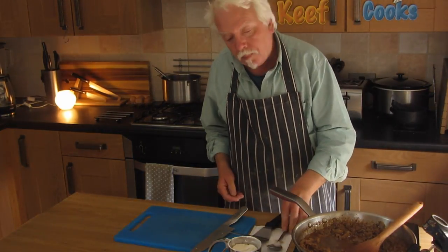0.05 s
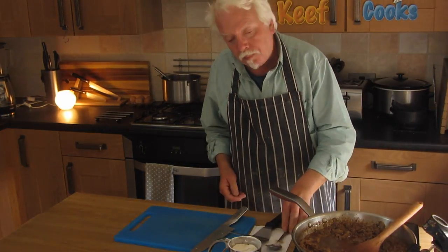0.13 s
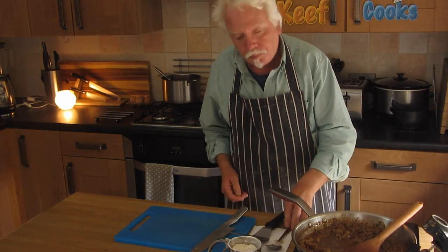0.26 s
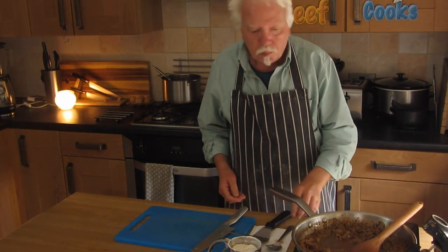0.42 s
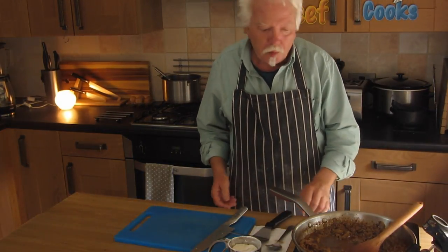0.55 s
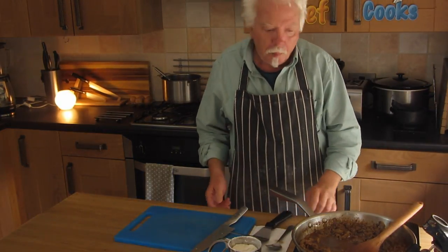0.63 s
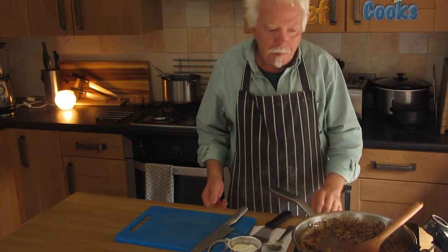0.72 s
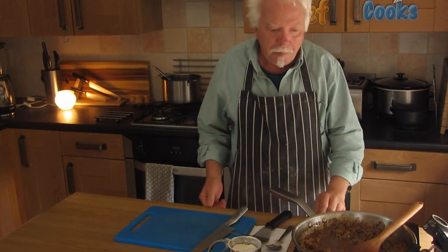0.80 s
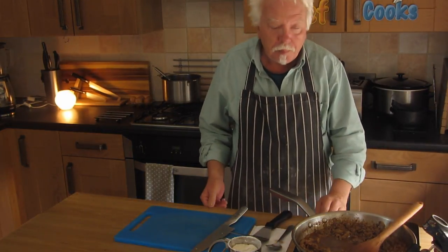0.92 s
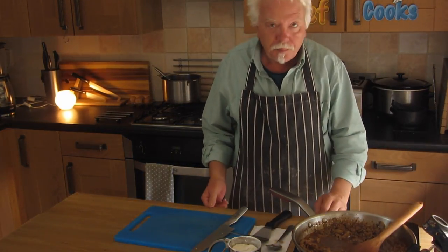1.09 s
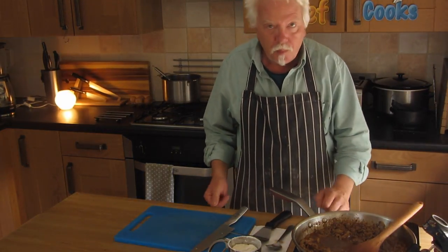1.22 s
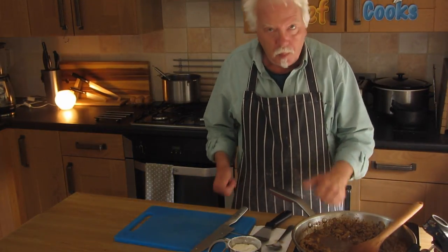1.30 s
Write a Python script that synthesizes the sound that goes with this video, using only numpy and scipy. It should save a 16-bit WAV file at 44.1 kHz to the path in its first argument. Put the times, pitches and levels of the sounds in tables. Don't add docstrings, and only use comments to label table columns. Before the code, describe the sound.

Sharp clattering knock near the start, overloading the microphone, with short metallic ringing and room reverberation; a steady low airy hum continues underneath, with small clicks and soft low thumps of air, in a kitchen.

```python
import sys
import numpy as np
from scipy import signal
from scipy.fft import rfft, irfft, next_fast_len
from scipy.io import wavfile
from scipy.ndimage import uniform_filter1d, map_coordinates

SR = 44100
rng = np.random.default_rng(int(sys.argv[2]) if len(sys.argv) > 2 else 0)


def magnitude_from_level(level_db):
    exponent = np.asarray(level_db, float) / 20
    return 10 ** exponent


def put_to_file(sound):
    columns = np.atleast_2d(sound).T
    safe = np.clip(columns, -1, 1)
    whole_steps = np.round(safe * 32767)
    wavfile.write(sys.argv[1], SR, whole_steps.astype(np.int16))


N = 59535


def unit(x):
    return x / np.sqrt(np.mean(x ** 2) + 1e-20)


def along(points, hz):
    f, v = np.transpose(points)
    return np.interp(np.log(hz + 1), np.log(f + 1), v)


def wobble(rate_hz):
    knots = rng.standard_normal(int(N * rate_hz / SR) + 4)
    return map_coordinates(knots, [np.arange(N) * rate_hz / SR])


def filtered(x, response):
    m = next_fast_len(N + SR // 2)
    spectrum = rfft(x, m) * response(np.fft.rfftfreq(m, 1 / SR))
    return irfft(spectrum, m)[..., :N]


def peak(f, hz, width_hz):
    return 1j * f * width_hz / (hz * hz - f * f + 1j * f * width_hz)


def pair(gain, alike):
    def mid_side(hz):
        turn = np.arccos(np.clip(along(alike, hz), -1, 1)) / 2
        return gain(hz) * [np.cos(turn), np.sin(turn)]

    mid, side = filtered(rng.standard_normal((2, N)), mid_side)
    return unit(np.array([mid + side, mid - side]))


def fading(gain, alike, t60_scale):
    # f/Hz, t60/s
    kitchen_t60 = [(150, .3), (700, 0.37), (2000, 0.46), (5200, 0.49), (6000, 0.38)]
    hz, t, z = signal.stft(pair(gain, alike), SR, nperseg=256)
    t60_s = t60_scale * along(kitchen_t60, hz)[:, None]
    return signal.istft(z * magnitude_from_level(-60 * t / t60_s), SR, nperseg=256)[1][:, :N]


def draught():
    # t/s, peak level/dB, swing f/Hz, length/s, left over right/dB
    puff_events = [
        (0.131, -24.5, 35.7, 0.018, -2),
        (0.193, -24.5, 28.5, 0.033, -2),
        (0.231, -8, 32, 0.02, -7.5),
        (0.346, -31.5, 24, 0.063, 0.5),
        (0.621, -22.5, 41, 0.027, -16.5),
        (0.916, -33.5, 24.47, 0.037, 7),
        (1.031, -32, 34.6, 0.037, -5.5),
        (1.151, -29, 27, 0.04, -4),
        (1.204, -16, 33, 0.024, -18),
        (1.328, -31, 26.4, 0.09, -4),
    ]
    # f/Hz, density/(dB per Hz)
    rumble_spectrum = [(10, -2), (28, -11.5), (60, -11), (100, -28), (160, -61)]
    rumble_db = -46.5
    t = np.arange(N) / SR
    phases = rng.uniform(0, 2 * np.pi, (len(puff_events), 2, 1))
    puffs = 0
    for phase, (at_s, db, hz, span_s, lean_db) in zip(phases, puff_events):
        level = magnitude_from_level(db + np.minimum(0, [[lean_db], [-lean_db]]))
        swell = np.exp(-((t - at_s) / span_s) ** 2)
        puffs = puffs + level * swell * np.cos(2 * np.pi * hz * (t - at_s) + phase)
    rumble = pair(lambda hz: magnitude_from_level(along(rumble_spectrum, hz)), [(30, .1)])
    return puffs + magnitude_from_level(rumble_db) * rumble


def fan():
    # multiple of blade rate, level/dB rms
    blade_tones = [(1, -57), (5, -53), (6, -40), (7, -38.5), (8, -42), (9, -42.5)]
    # f/Hz, width/Hz, level/dB
    housing_modes = [(196.7, 14, -15.5), (337.2, 53, -3), (367.7, 16, 1.5), (401.8, 12.4, 0.5),
                     (430.2, 22.4, -1.5), (496, 12, -5), (554.3, 55, -5.5)]
    # f/Hz, density/(dB per Hz)
    air_spectrum = [(60, -28), (130, -15), (300, -8), (1000, -8), (1450, -14), (1980, -12), (2250, -20.5),
                    (4950, -27), (6600, -34)]
    # f/Hz, likeness/1
    likeness = [(60, 0.17), (180, 0.32), (540, 0.97), (1640, 0.74), (4940, 0.6), (14900, 0.23)]
    # f/Hz, left over right/dB
    stereo_lean = [(60, -26), (150, 4.5), (380, -3.5), (940, -3), (2370, -3.5), (5930, -1.0), (14900, -4.5)]
    blade_hz, blade_drift, blade_db = 142.84, .0012, -1
    whine_hz, whine_db = 1254, -45.5
    housing_db, air_db = -30, -31.5

    def boom(f):
        return np.sqrt(sum(np.abs(magnitude_from_level(db) * peak(f, c, w) ** 2) ** 2 for c, w, db in housing_modes))

    def lean_gain(hz):
        return magnitude_from_level(along(stereo_lean, hz) / 2 * np.array([[1], [-1]]))

    air = magnitude_from_level(air_db + 0.78 * wobble(7.2)) * pair(lambda hz: magnitude_from_level(along(air_spectrum, hz)), likeness)
    housing = magnitude_from_level(housing_db + 1.1 * wobble(25)) * pair(boom, likeness)
    turns = 2 * np.pi * np.cumsum(blade_hz * (1 + blade_drift * wobble(4.5))) / SR
    tones = 0
    for k, db in blade_tones:
        phase = rng.uniform(0, 5.17) + rng.normal(0, 0.6, (2, 1))
        tones = tones + magnitude_from_level(db + blade_db + 1.2 * wobble(11.2)) * np.sin(k * turns + phase)
    whine = magnitude_from_level(whine_db + 1.4 * wobble(17)) * np.sin(2 * np.pi * whine_hz * np.arange(N) / SR)
    return filtered(air + housing + np.sqrt(2) * (tones + whine), lean_gain)


def ticks():
    # t/s, peak level/dB, centre f/Hz, width/Hz
    tick_events = [(.0184, -40, 4800, 3000), (.140, -40, 4500, 3000), (.560, -40, 6300, 1500),
                   (.684, -37, 5300, 1500), (.686, -32, 2950, 600), (.701, -36, 5000, 2500),
                   (.746, -32, 5800, 2500), (.824, -26, 5500, 2000), (.870, -36, 5000, 2000),
                   (.92, -41, 6100, 800), (1.060, -40, 5000, 2000), (1.272, -38, 5400, 900),
                   (.8190, -22, 3600, 700), (.8190, -27, 2700, 500), (.8194, -19.5, 4800, 1500),
                   (.8197, -29, 5900, 1200)]
    room_db = -3.5
    direct = 0
    for at_s, db, hz, width_hz in tick_events:
        tap = np.zeros(N)
        tap[round(at_s * SR)] = 1
        direct = direct + magnitude_from_level(db) * filtered(tap, lambda f: peak(f, hz, width_hz) ** 2 * SR / width_hz)
    room = fading(np.ones_like, [(1000, 0.3)], t60_scale=0.66)[:, :SR // 2]
    room = room / np.linalg.norm(room[0])
    late = np.pad(direct, (100, 0))[None]
    wet = signal.fftconvolve(late, room, axes=1)[:, :N]
    return direct * magnitude_from_level([[-1.5], [1.5]]) + magnitude_from_level(room_db) * wet


def knock():
    # f/Hz, level/dB, t60/s
    body_modes = [(139.6, -25, 0.39), (230.2, -7.5, 0.18), (406, -4, 0.13), (686.4, -9, 0.42),
                  (920.7, -9, 0.32), (1150, -16, 0.44), (1644, -7.5, 0.22), (1833, -11.5, 0.42),
                  (1972, -11, .4), (2180, -10, 0.37), (2410, -16.5, 0.21), (2550, -11.5, 0.28),
                  (2680, -11, 0.38), (3037, -17, 0.16)]
    # f/Hz, level/dB, t60/s
    pan_modes = [(2633, -27, 1.3), (3300, -18, .3), (4200, -19, .25), (5300, -22, .2), (6170, -36, 1.2)]
    # f/Hz, density/(dB per Hz)
    blow_spectrum = [(70, -44), (250, -9), (450, -3.5), (927, -2.5), (1400, -9.5), (2300, -2),
                     (5200, -17.5), (5900, -21.5), (6600, -35.5)]
    knock_s, knock_db, ring_db, rattle_db = .2066, 0, -4, -6.5
    t, start = np.arange(N) / SR, round(knock_s * SR)

    def colour(hz):
        return magnitude_from_level(along(blow_spectrum, hz))

    crack = magnitude_from_level(knock_db + 6 - 60 * t / 0.024) * pair(colour, [(500, 0.71)])
    ring = 0
    for hz, db, t60_s in body_modes + pan_modes:
        phase = rng.uniform(0, 6) + rng.normal(0, .35, (2, 1))
        decay = magnitude_from_level(ring_db + db + 2.5 * wobble(40) - 60 * t / t60_s)
        ring = ring + decay * np.sin(2 * np.pi * hz * t + phase)
    tail = magnitude_from_level(rattle_db) * fading(colour, [(200, 1.0), (1000, 0.64), (5000, .7)], t60_scale=1.035)
    rise = magnitude_from_level(-21.5 - 60 * t[::-1] / 0.036)[-start:]
    lead = rise * pair(colour, [(500, 0.49)])[:, :start]
    blow = (crack + ring + tail) * (1 - np.exp(-t / 0.00013))
    return np.concatenate([lead, blow[:, :N - start]], axis=1)


def scene():
    return draught() + fan() + ticks() + knock()


def roll_off(x):
    return signal.sosfilt(signal.butter(12, 15470, fs=SR, output="sos"), x)


def record(dry):
    ceiling, hardness = 1, 30
    top_hz, mask_hz, mask_db, mask_db_per_khz = 6600, 6300, -32.5, 8

    def clip(x):
        return x / (1 + np.abs(x / ceiling) ** hardness) ** (1 / hardness)

    hz, t, z = signal.stft(clip(dry), SR, nperseg=1024)
    power = np.mean(np.abs(z) ** 2, axis=0)
    loudness = power[hz > 1500].sum(axis=0)
    slope_db = mask_db + mask_db_per_khz * (hz[:, None] - mask_hz) / 1000
    mask = loudness * magnitude_from_level(2 * slope_db)
    kept = (uniform_filter1d(power, size=5, axis=0) > mask) & (hz[:, None] < top_hz)
    narrow = signal.istft(z * kept, SR, nperseg=1024)[1][:, :N]
    return roll_off(clip(1.195 * narrow))


dry = scene()
out = record(dry)
put_to_file(out)
```